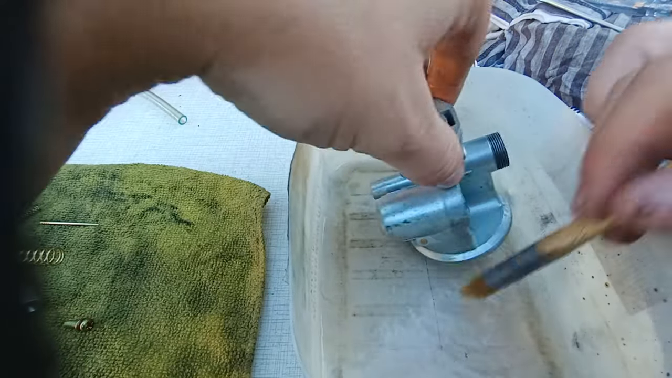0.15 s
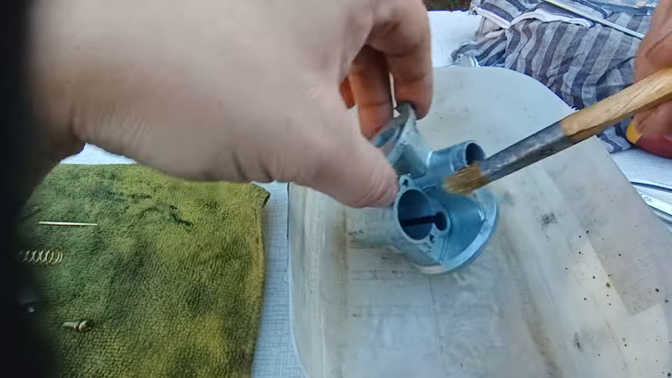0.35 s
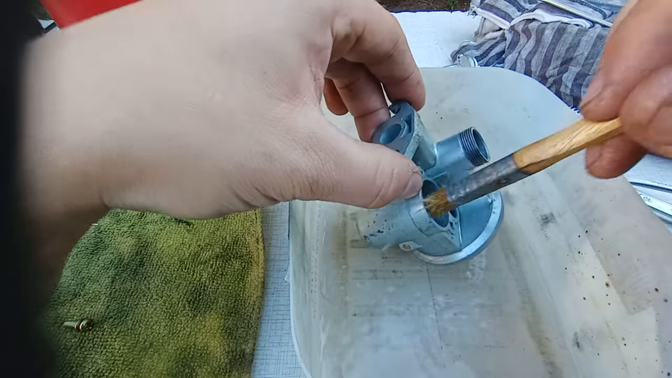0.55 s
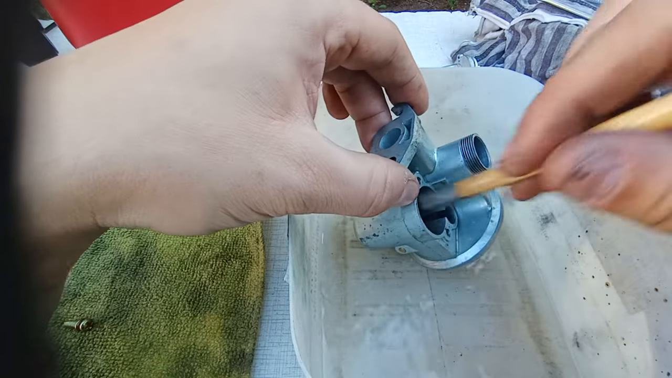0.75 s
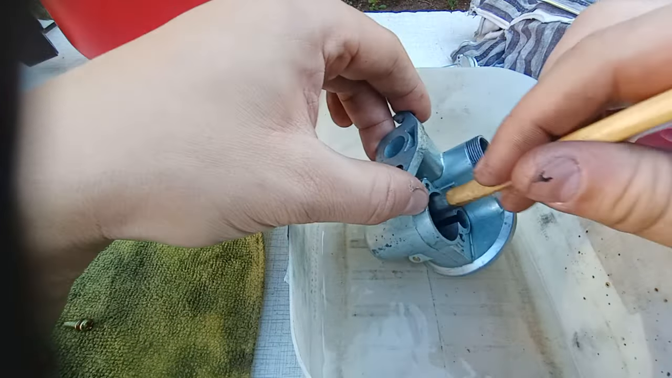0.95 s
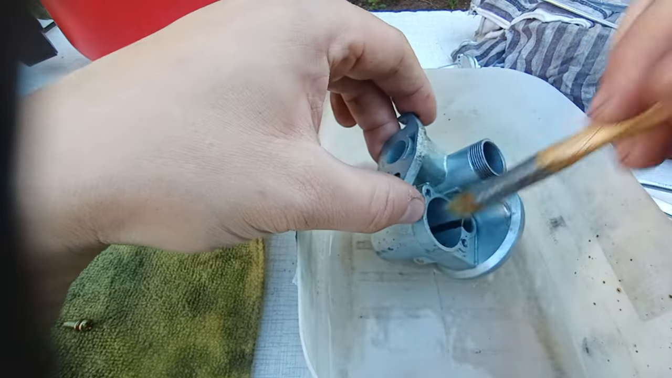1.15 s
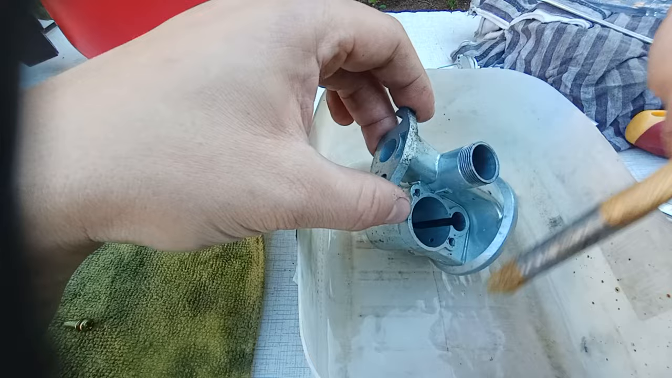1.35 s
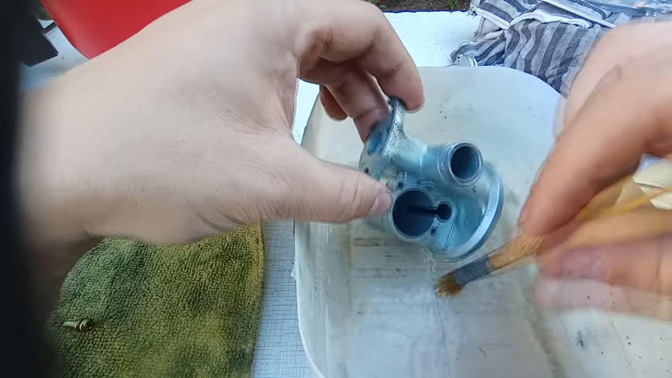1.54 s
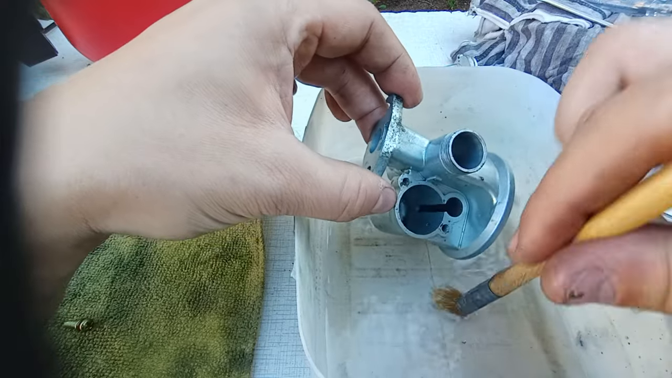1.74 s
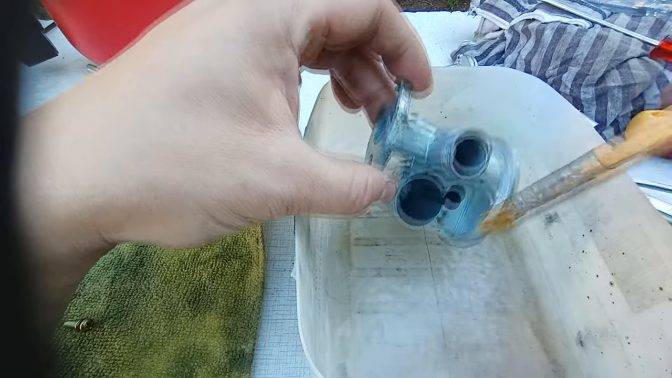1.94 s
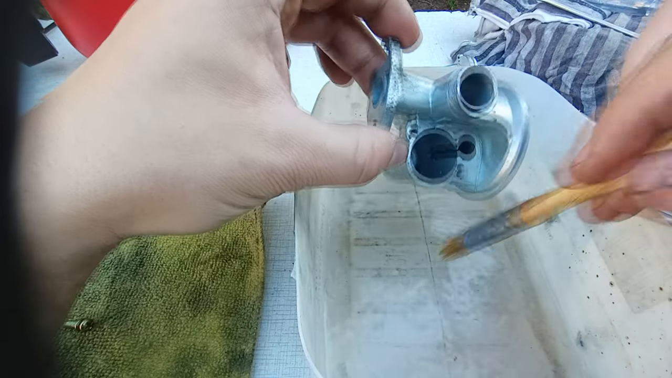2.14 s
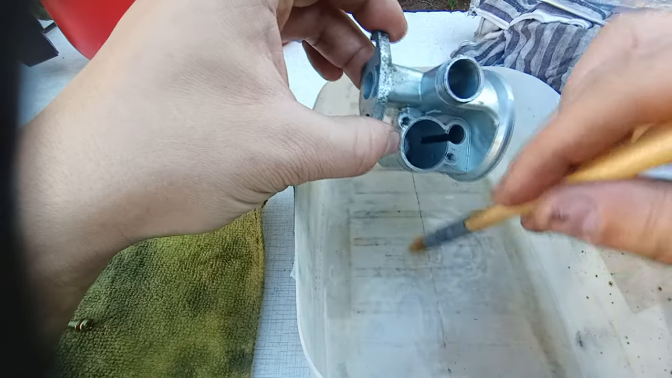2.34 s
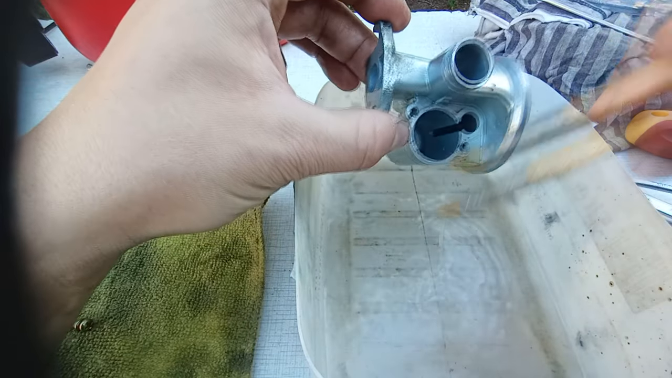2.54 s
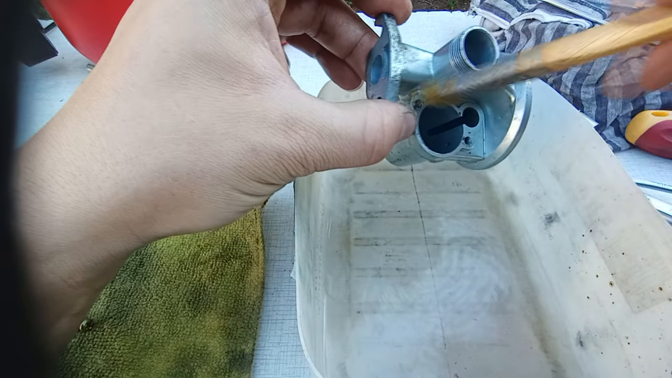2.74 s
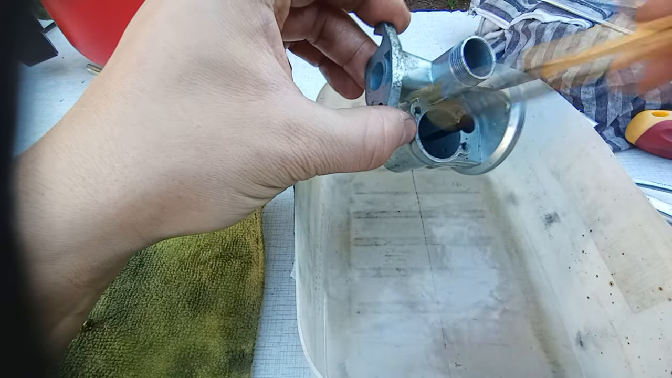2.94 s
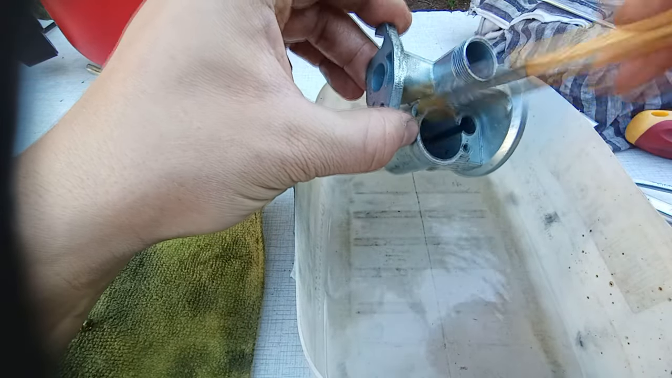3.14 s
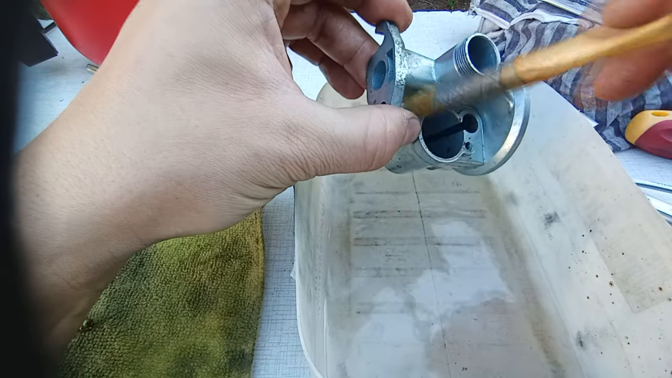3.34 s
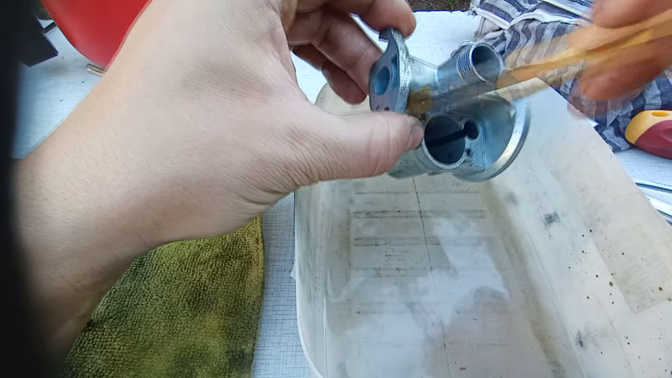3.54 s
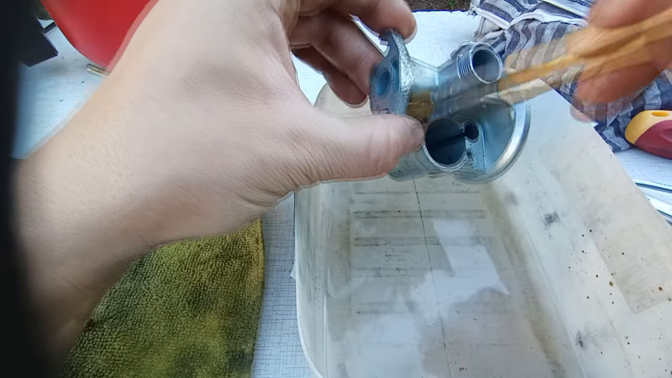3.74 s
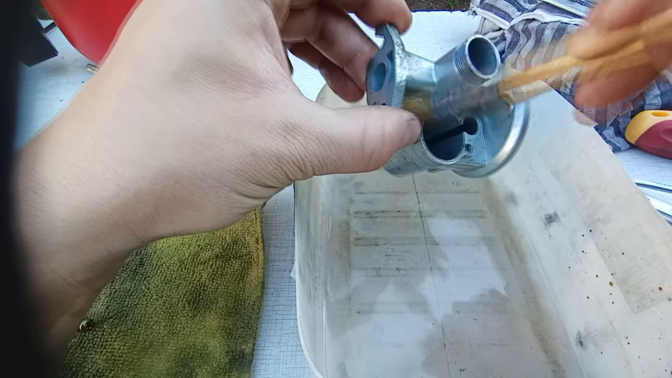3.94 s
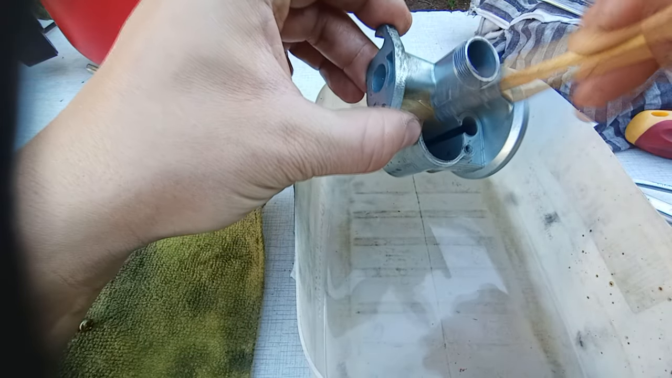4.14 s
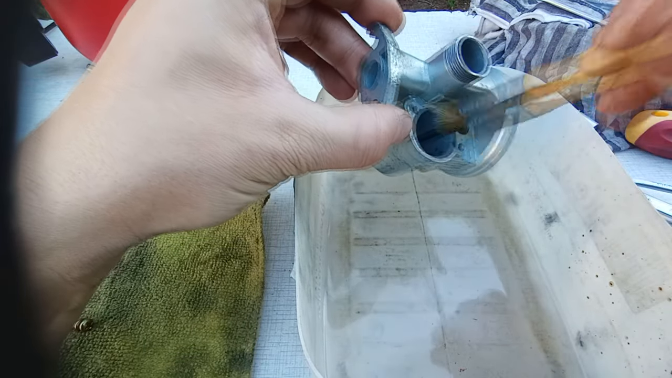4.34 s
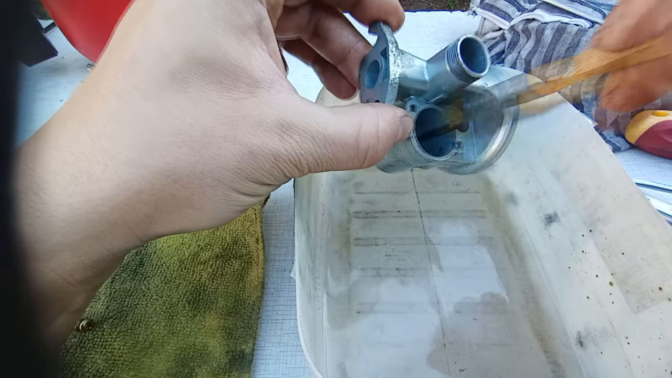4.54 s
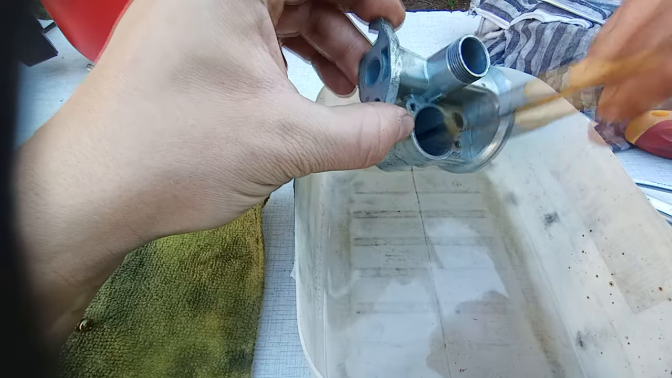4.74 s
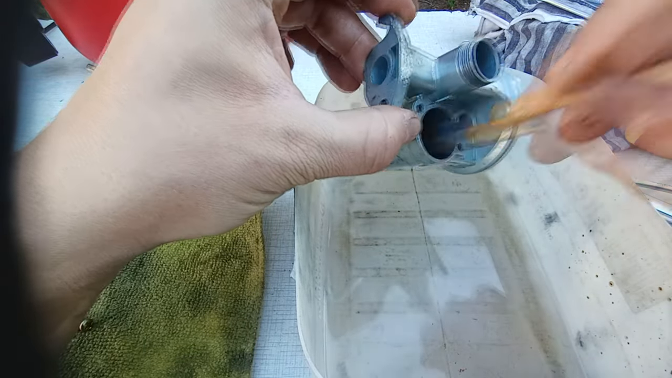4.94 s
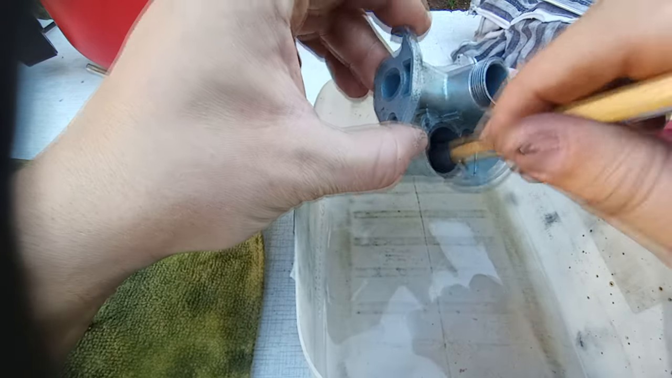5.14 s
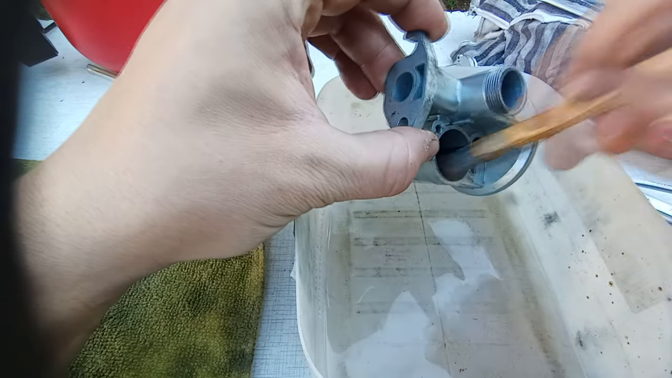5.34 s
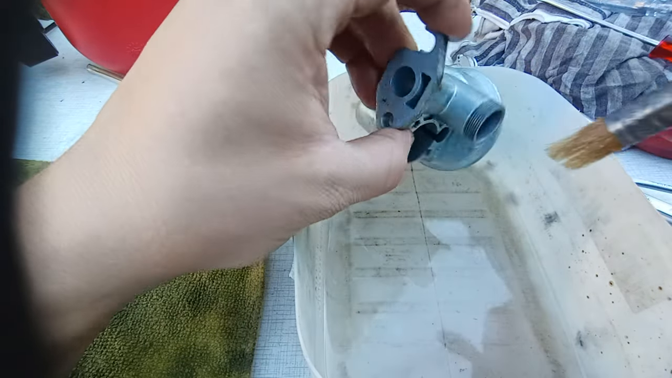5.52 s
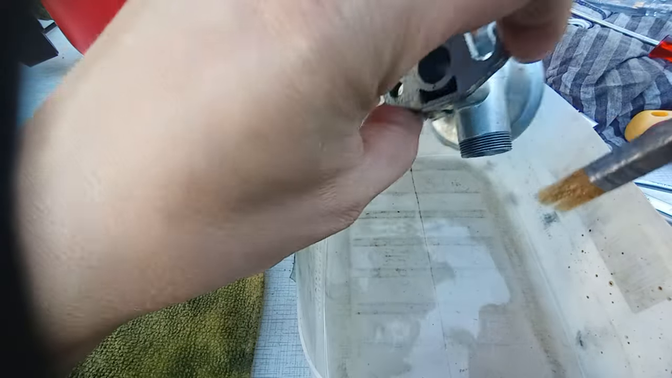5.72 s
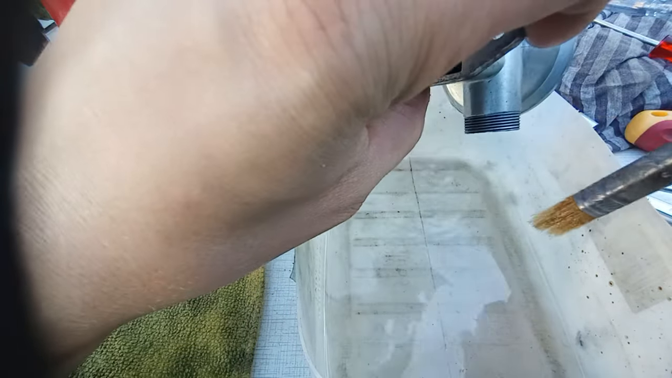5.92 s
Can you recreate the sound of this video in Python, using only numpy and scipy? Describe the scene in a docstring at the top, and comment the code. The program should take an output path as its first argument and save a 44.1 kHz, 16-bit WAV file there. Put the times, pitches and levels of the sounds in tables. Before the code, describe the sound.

A close stereo pickup outdoors, dry, with very quiet surroundings. At 0 s a small metal clink and a hollow plastic tub bump with a short scrape, over a faint low hum that soon fades. From 0.3 to 0.9 s a wet bristle brush scratches a cast-metal body, with a bright ringing tap near 0.8 s. About 1.05 s comes the strongest dull tub knock, with wet rubbing, then a metal tick at 1.2 s. Lighter tub rubs and dabs follow at 1.3, 1.5, 1.7, 2.25 and 2.4 s, with lulls between. From 2.8 to 4.9 s hissing strokes repeat about five times a second, airy and hollow in the bore, with tiny ticks. From 4.95 to 5.35 s the scrubbing turns scratchier and more metallic, with several clinks. A soft tub touch at 5.6 s ends it. Faint wind buffets, distant traffic and barely audible brief dove coos lie behind.

```python
"""A wet bristle brush scrubs a small cast-metal carburettor body: slipping bristle noise hisses, scratches,
blows the bore and wakes the casting's modes. Ferrule taps crack and ring the casting as damped sines.
Rubs and knocks sound the plastic tub below through noise, bubbles, wall modes and low thumps.
Far off a dove coos in scooped sines; low wind noise, a traffic drone, a soft hush and a fading hum are behind."""
import sys
import numpy as np
from scipy import signal
from scipy.fft import rfft, irfft, next_fast_len
from scipy.io import wavfile
from scipy.ndimage import uniform_filter1d, map_coordinates

SR = 44100
rng = np.random.default_rng(int(sys.argv[2]) if len(sys.argv) > 2 else 0)


def unload_wav(signal):
    """Save mono or channel-first audio to the path in sys.argv[1] as 16-bit WAV at rate SR, clipped to [-1, 1]."""
    wavfile.write(
        sys.argv[1],
        SR,
        np.round(np.clip(np.atleast_2d(signal).T, -1, 1) * 32767).astype(np.int16),
    )


N = 263718

# modes of the casting: mode_hz, level_db, free_t60_s, part (0 bore, 1 flange, 2 lug, 3 tube)
CASTING_MODES = [(1476, -4, .1, 0), (2380, -8.5, 0.037, 1), (2720, -14, 0.019, 1), (3290, -1.5, .085, 1),
                 (3830, -12, 0.048, 1), (5070, -0.5, .16, 2), (5394, -4.5, 0.16, 3), (5910, -1.5, 0.094, 3),
                 (6770, -18.5, .04, 3)]
# modes of the tub wall: mode_hz, level_db, t60_s
TUB_MODES = [(139, -7.5, 0.19), (348, -13, 0.08), (632, -10.5, 0.026), (686, 1.5, 0.07), (894, -4, 0.06),
             (1161, -7, .045), (1610, -4, 0.019), (1940, -15.5, 0.065), (2510, -28.5, .04)]


def strokes():
    """Bristle slips hiss, scratch the walls, sound the air in the bore and wake the casting's modes faintly."""
    # brush strokes: touch_s, rise_s, hiss_peak_db, swell_db, fade_t60_s, then re hiss: bore_db, scratch_db,
    # casting_ring_db; swish_hz
    stroke_rows = [(.315, .03, -64, 2.5, .1, -22, -18, 5, 5737),
                   (.35, .054, -50.5, 4.5, .15, -19, -3, 11, 4190),
                   (.455, 0.024, -46, 16, 0.064, -6, -5, -3, 5990),
                   (.552, .102, -50, 15, .035, 1.5, -2, -3, 5600),
                   (.72, 0.05, -61, 2.5, .05, -12, -0.5, 3, 5800),
                   (.8, .003, -45, 0.5, .3, -29, 7.5, 1.5, 4810),
                   (.845, 0.021, -42.5, 5.5, 0.2, -4.5, 0.5, -2, 4900),
                   (2.776, .008, -51, -1.5, .08, -9.5, -13.5, -4.5, 5300),
                   (2.795, 0.026, -49.5, 3.5, .1, -10.5, 6.5, -2, 3650),
                   (2.82, .024, -40.5, 13, .085, 1.5, -3.5, -2.5, 4960),
                   (2.996, .054, -44.5, 14.5, 0.049, 0.5, -10.5, -3.5, 6500),
                   (3.188, 0.066, -44, 11.5, .05, 3.5, -8.5, -1, 6440),
                   (3.368, .066, -42.5, 10, .025, 0.5, -6.5, -4.5, 6960),
                   (3.516, .04, -67, -1.5, .1, -15, -17.5, -4.5, 6570),
                   (3.57, 0.068, -47, 7, 0.067, 4, -6.5, -6.5, 6730),
                   (3.728, .03, -64, 5, 0.15, -15, -12, -5.5, 6760),
                   (3.765, .062, -48.5, 10.5, .07, 9, -4, -7, 7100),
                   (3.92, 0.025, -65.5, 3, .1, -16, -15, -5.5, 6550),
                   (3.95, .062, -48, 14.5, .04, 10, -1, -4, 6540),
                   (4.108, 0.027, -66, 0, .1, -21, -11, -1.5, 6300),
                   (4.135, 0.078, -50, 9, .09, 5.5, -3.5, -11, 6425),
                   (4.305, .05, -53.5, 5, .1, 9, -5, -14, 3728),
                   (4.36, .063, -45, 7.5, .1, -1.5, -3.5, -9, 5400),
                   (4.52, 0.065, -50.5, 9.5, .16, 4.5, -1.5, -6, 5700),
                   (4.72, 0.047, -48.5, 11, 0.23, 4, -4, -2.5, 6530),
                   (4.95, 0.0027, -54.5, 0, 0.16, 2, 1, 9, 3360),
                   (5.035, .018, -44.5, 24.5, .08, -5.5, -11, 13, 4560),
                   (5.118, .004, -51, -1.5, 0.097, -1, 7, 6, 3994),
                   (5.19, 0.022, -55.5, 1.5, .05, -7, 9, 9, 5400),
                   (5.214, .004, -44.5, 5, .12, -9, 1.5, 13, 5370),
                   (5.29, .003, -50.5, -3, .08, -10, -13, 11.5, 5394),
                   (5.31, .046, -56.5, 2, .16, 9, 7, 9, 5400)]
    # bristle hiss spectrum: hz, gain_db
    hiss_spectrum = [(2500, -37.5), (3800, -18), (5000, -8), (6500, -1.5), (7400, -6.5), (8100, -17.5),
                     (10000, -27.5), (12400, -28.5), (14700, -22.5), (15700, -29.5)]
    # wall scratch spectrum: hz, gain_db
    scratch_spectrum = [(700, -33), (1000, -17.5), (2000, -0.5), (3500, 3), (4500, -10.5), (6000, -37.5)]
    hiss_db, rising_db, fading_db, _, bore_db, scratch_db, ring_db, swish_hz = gestures(
        stroke_rows, touch_db_per_s=1602)
    # dB change re hiss per dB that the hiss lies under its peak
    bore_db = bore_db - 0.65 * rising_db - 0.1 * fading_db
    scratch_db = scratch_db - 0.6 * rising_db + 0.15 * fading_db
    slips = bristles(rate=1500, spread_db=4.0, smooth=0.57, clump_db=1.9, patchy_db=2.5)

    # the free length of the bent bristles sets where the swish is strongest
    hz, t, z = signal.stft(slips, SR, nperseg=256)
    centre_hz = swish_hz[np.minimum((t * SR).astype(int), N - 1)]
    log_offset = np.log((hz[:, None] + 1) / centre_hz)
    swish_gain = amp(7.4 * np.exp(-(log_offset / 0.097) ** 2))
    swish = signal.istft(z * swish_gain, nperseg=256)[1][:N]
    hiss = amp(hiss_db) * coloured(swish, hiss_spectrum)
    scratch = amp(hiss_db + scratch_db - 2.5) * coloured(swish, scratch_spectrum)

    def bore(hz):
        return resonance(hz, 1540, 0.05)
    push = evened(slips, size=300)
    blown = filtered(amp(hiss_db + bore_db) * push, bore) / np.std(filtered(push, bore))
    # the bore mode is left out here
    ring = filtered(amp(ring_db) * (hiss + scratch), lambda hz: mode_bank(hz, CASTING_MODES[1:]))
    return hiss + scratch + blown + ring


def taps():
    """Each ferrule tap is a short crack and rings the parts it lands nearest; gripping fingers damp the ring."""
    # taps: start_s, crack_db, bore_db, flange_db, lug_db, tube_db, pan_db (+ left), share of free ring time
    tap_rows = [(0.0024, -19.5, -36.5, -25.5, -37, -38, 3.5, 0.82),
                (0.1696, -58, -58, -62, -75, -58, 0, 0.89), (0.4761, -38.5, -55, -68, -64.5, -58, 4, 0.66),
                (0.5638, -46, -58, -91, -76.5, -59, 2.5, 0.49), (0.586, -41, -61, -68, -70, -51, 0, 0.44),
                (0.6535, -39, -62, -61, -43, -38, 3, 0.2), (0.7424, -38, -53, -61, -65, -39, 5, 0.25),
                (0.767, -22.5, -53, -50, -51, -29, 6, 0.12),
                (0.785, -10.5, -35.5, -13.5, -53, -15, 5, 0.44),
                (0.819, -24.5, -61, -33.5, -55, -36, 5, 0.69), (0.978, -24, -58, -44, -66, -51, -4, 0.52),
                (0.9962, -17, -60, -54, -65, -43, 10, 0.94),
                (1.1961, -16, -39, -38, -37.5, -44.5, -8, 0.87),
                (2.7444, -31, -59, -49.5, -61.5, -64.5, -6, 0.46),
                (2.779, -42, -60, -63, -51, -60, 3, 0.57), (2.8496, -30.5, -52, -53, -46, -51, -7.5, 0.2),
                (3.0479, -32, -36, -57.5, -58.5, -54.5, 3.5, 0.34),
                (3.5704, -51.5, -56.5, -69, -60.5, -48, 1, 0.65),
                (3.6375, -34, -44, -54, -61.5, -61, 6, 0.51), (4.3011, -29, -39.5, -54, -70, -55, 0, 0.64),
                (4.3114, -28.5, -40.5, -48, -63, -60, -18, 0.68),
                (4.4136, -27.5, -38, -40, -42, -34.5, -2, 0.34),
                (4.943, -20, -27.5, -26, -70.5, -35.5, -3, 0.45),
                (4.9739, -28, -53, -45, -62, -51, 1, 0.49), (5.0526, -19.5, -65, -38.5, -53, -42, 3, 0.61),
                (5.1186, -24.5, -52, -37.5, -77, -51, 8, 0.93), (5.1868, -27, -41, -37, -71, -63, 2, 0.88),
                (5.216, -21.5, -60, -34, -58, -33.5, -7, 0.2), (5.2248, -24, -44, -59, -58, -68, 13, 1),
                (5.2818, -22, -34, -29.5, -51, -45, -1.5, 0.5)]
    # crack spectrum: hz, gain_db
    crack_spectrum = [(350, -53), (600, -19), (2220, 6), (2790, 0), (4200, -7), (5590, -2.5), (7330, -7.5),
                      (8630, -32.5), (15500, -39)]
    out, t = np.zeros((2, N + SR)), np.arange(SR // 6) / SR
    crack_gain = amp(along(crack_spectrum, np.fft.rfftfreq(len(t), 1 / SR)))
    crack_fade = amp(-60 * t / 0.0057) + 0.19 * amp(-60 * t / 0.061)
    for start_s, crack_db, *parts_db, pan_db, free in tap_rows:
        ring = 0
        for mode_hz, mode_db, t60_s, part in CASTING_MODES:
            level_db = parts_db[part] + mode_db + 3.0 + rng.normal(0, 0.32)
            fade = amp(-60 * t / (t60_s * np.clip(free, .1, 2)))
            # contact with wet bristles makes each mode waver
            waver = np.cumsum(rng.standard_normal(len(t))) * 0.022
            phase = 2 * np.pi * mode_hz * rng.normal(1, .002) * t + waver + lead_of(mode_hz)
            ring = ring + amp(level_db) * fade * np.sin(phase)
        ring = ring * (1 - np.exp(-t / 0.00018))
        # part shared by both ports, part separate
        noise = rng.standard_normal(len(t)) + .9 * rng.standard_normal((2, len(t)))
        burst = unit(irfft(rfft(noise) * crack_gain, len(t))) * (1 - np.exp(-t / 0.00025))
        crack = amp(crack_db - 6.0) * crack_fade * burst
        pan = amp([[0.15 * pan_db], [-.3 * pan_db]])
        out[:, round(start_s * SR):][:, :len(t)] += (ring + crack) * pan
    return out[:, :N]


def scrapes():
    """Rubbing shakes the tub wall and its liquid, rasps on its ribs and fizzes in the wet bristles."""
    # rubs: touch_s, rise_s, wall_peak_db, swell_db, fade_t60_s, then re wall: rasp_db, fizz_db
    scrape_rows = [(.03, 0.0062, -21.5, 1, 0.072, -9.5, -19.5), (.058, 0.014, -35.5, 0, .27, -3.5, -7),
                   (.183, 0.0087, -52, -2.5, 0.082, 1.5, -16.5), (.68, 0.13, -61, 4.5, 0.055, 3.5, 1.5),
                   (.83, .016, -45, 20, .14, -0.5, 3.5), (.89, 0.043, -35.5, 19, .13, -7.5, -18.5),
                   (.97, .01, -50, 11, 0.044, 3, 5), (1.02, 0.019, -45, 11, .05, -8, -1),
                   (1.047, 0.0055, -30, -1, 0.084, -1.5, -9), (1.085, 0.038, -37.5, 3.5, 0.18, -2, -7.5),
                   (1.272, 0.02, -51, 19, 0.083, -12, -17), (1.305, .029, -41.5, 21, 0.071, -11.5, -23.5),
                   (1.39, 0.061, -52, -3.5, 0.076, -4.5, -12), (1.475, 0.015, -43.5, 19, 0.14, 1.5, -6.5),
                   (1.512, 0.0056, -34, 9, 0.19, -6.5, -5.5), (1.57, .05, -60.5, -5, .2, -1, -2.5),
                   (1.63, .029, -56, 7, .08, 3, 3), (1.729, 0.0081, -38, 5, .15, 0.5, -1.5),
                   (1.79, 0.03, -57.5, 3, .08, 6.5, 8.5), (2.245, 0.0085, -35.5, 4.5, 0.082, -2.5, -2.5),
                   (2.28, 0.024, -55.5, 3.5, 0.092, 1, 11), (2.378, .006, -38.5, 2, 0.16, -4, -7.5),
                   (2.42, 0.043, -61, -7, 0.103, 3.5, 0.5), (4.47, 0.25, -66.5, 5.5, .25, -0.5, -0.5),
                   (5.115, 0.034, -54.5, 10.5, 0.093, -1, -6.5), (5.6, 0.024, -45.5, 15, .073, -4.5, -17.5)]
    # wall rumble spectrum: hz, gain_db
    wall_spectrum = [(120, -47.5), (300, -5.5), (450, 8.5), (700, 2), (1200, 5), (1700, -18), (2500, -56)]
    # rib rasp spectrum: hz, gain_db
    rasp_spectrum = [(1000, -37), (1500, -1.5), (2300, 4.5), (3200, -7.5), (4200, -13), (5500, -53)]
    # bristle fizz spectrum: hz, gain_db
    fizz_spectrum = [(1760, -37.5), (3000, -10.5), (4480, -2), (4870, -4.5), (5400, -3), (7430, -7),
                     (8540, -33), (12900, -35.5), (14500, -29), (15700, -31)]
    wall_db, rising_db, fading_db, _, rasp_db, fizz_db = gestures(scrape_rows, touch_db_per_s=7000)
    # dB gained re wall per dB that the wall lies under its peak
    rasp_db = rasp_db + 0.3 * rising_db + 0.05 * fading_db
    fizz_db = fizz_db + 0.17 * rising_db + 0.033 * fading_db
    slips = bristles(rate=2800, spread_db=3.5, smooth=0.68, clump_db=2.0, patchy_db=1.0)
    wall = filtered(coloured(slips, wall_spectrum), lambda hz: 1 + 1.9 * mode_bank(hz, TUB_MODES))
    wet_wall = unit(wall) + 0.41 * bubbles(count=1500, centre_hz=710, cycles=3.3)
    rasp = coloured(slips, rasp_spectrum) + 0.21 * bubbles(count=2400, centre_hz=2280, cycles=5.7)
    fizz = coloured(slips, fizz_spectrum)
    return amp(wall_db) * (unit(wet_wall) + amp(rasp_db) * unit(rasp) + amp(fizz_db) * fizz)


def knocks():
    """Each knock rings the tub's modes at new strengths; a hard contact adds a bright puff."""
    # knocks: start_s, level_db, bright_db, overall_t60_s, pan_db (+ left)
    knock_rows = [(0.03, -14.5, -29.5, 0.25, 10), (0.183, -52.5, 13, 0.049, 5.5),
                  (0.393, -41, -1.5, 0.084, 6), (1.049, -10.5, -11, 0.082, 7.5),
                  (1.329, -49.5, -20, 0.056, -9), (1.489, -36, -5, 0.06, -3), (1.515, -26, -15.5, 0.06, -3),
                  (1.732, -30, -18.5, 0.07, 6.5), (2.246, -39, -4, 0.06, 1),
                  (2.377, -41.5, -8.5, 0.076, 23), (5.619, -37.5, -20, 0.046, -11)]
    out, t = np.zeros((2, N + SR)), np.arange(SR // 4) / SR
    puff_band = signal.butter(2, [1500 * 2 / SR, 7000 * 2 / SR], "band")
    for start_s, level_db, bright_db, overall_t60_s, pan_db in knock_rows:
        fade = amp(-60 * t / max(overall_t60_s, .01))
        ring = 0
        for mode_hz, mode_db, t60_s in TUB_MODES:
            envelope = amp(mode_db + rng.normal(0, 5.1) - 60 * t / t60_s)
            phase = 2 * np.pi * mode_hz * rng.normal(1, 0.02) * t + lead_of(mode_hz)
            ring = ring + envelope * np.sin(phase)
        body = amp(level_db - 7.5) * np.sqrt(fade) * (1 - np.exp(-t / 0.00089)) * ring
        noise = signal.lfilter(*puff_band, rng.standard_normal((2, len(t))))
        puff = amp(level_db + bright_db - 19.5) * fade * noise
        pan = amp([[0.5 * pan_db], [-.3 * pan_db]])
        out[:, round(start_s * SR):][:, :len(t)] += (body + puff) * pan
    return out[:, :N]


def dove():
    """Soft, nearly pure coos that scoop up to pitch and sag in level, a little unsteady from the distance."""
    # coos: start_s, length_s, opening_db, pitch_hz
    coo_rows = [(1.983, .02, -68, 670), (2.465, 0.13, -58, 700), (4.011, .08, -60.5, 700.6),
                (4.555, 0.035, -64, 705), (5.716, 0.066, -61.5, 696)]
    sag_db_per_s, t60_s, scoop_hz, scoop_s = 95, .13, 15, 0.0151
    rows = []
    for start_s, length_s, opening_db, pitch_hz in coo_rows:
        sag_db = sag_db_per_s * length_s
        # negative swell: the level falls from the opening
        rows.append((start_s, length_s, opening_db - sag_db, -sag_db, t60_s, pitch_hz))
    level_db, _, _, age_s, hz = gestures(rows, touch_db_per_s=1100)
    hz = hz - scoop_hz * np.exp(-age_s / scoop_s)
    coo = np.sin(2 * np.pi * np.cumsum(hz + 9 * wobble(45)) / SR)
    unsteady_db = 5 * np.array([wobble(28), wobble(22)])
    return np.sqrt(2) * amp(level_db + unsteady_db) * coo


def outdoors():
    """Low buffets in lumps (wind, some tub thumps), far traffic, a soft patchy hush and a hum that fades out."""
    # low buffets, wind and bass thumps of the tub near 0-0.2 s and 1.0 s: time_s, buffet_db, left_minus_right_db
    buffet_rows = [(0.0, -63, 9), (0.2, -62, 2.5), (0.4, -77.5, 3), (0.7, -75, 6.5), (0.96, -59, 7),
                   (1.06, -53, 10), (1.2, -67.5, 6), (1.45, -69.5, -5), (1.51, -53.5, -17),
                   (1.7, -52.5, -18.5), (1.82, -63, -16), (2.18, -61.5, -16), (2.27, -63, 3.5),
                   (2.7, -77.5, 6.5), (3.76, -72, 2.5), (4.6, -78.5, 9), (5.2, -71.5, -5.5),
                   (5.27, -55.5, -23.5), (5.45, -55, -18.5), (5.66, -62, -10), (5.98, -61.5, -13.5)]
    # hush, fuller while the hands move: time_s, level_db
    hush_rows = [(0.0, -43), (0.18, -65), (0.46, -67), (1.0, -47.5), (1.23, -55), (1.65, -68), (3.78, -69),
                 (4.58, -61.5), (4.95, -69.5), (5.21, -60.5), (5.4, -67), (5.98, -66.5)]
    # hum: time_s, level_db, pitch_hz
    hum_rows = [(0, -60, 65), (.4, -63, 64.8), (.7, -71, 64.3), (.8, -97.5, 65)]
    # buffet spectrum: hz, gain_db
    buffet_spectrum = [(12, -49.5), (20, -20), (41, -12.5), (61, 4), (134, 1), (236, -10.5), (300, -20),
                       (400, -26.5), (520, -52.5), (880, -120)]
    # hush spectrum before the treble lift: hz, gain_db
    hush_spectrum = [(88, -27.5), (150, -12), (419, -14), (726, -16), (1350, -23.5), (2480, -23.5),
                     (3580, -37.5), (3920, -38), (6320, -42.5), (6800, -35.5), (7870, -55.5),
                     (12000, -61.5), (15600, -92), (22000, -120)]
    # far traffic spectrum: hz, gain_db
    drone_spectrum = [(12, -45.5), (20, -14.5), (35, -4.5), (59, 2), (108, -4), (160, -13.5), (210, -41.5),
                      (350, -120)]
    buffet_db, pan_db = curves(buffet_rows)
    hush_db, = curves(hush_rows)
    hum_db, hum_hz = curves(hum_rows)

    a, b = rng.standard_normal((2, N))
    lumps = amp(3.7 * np.array([wobble(21), wobble(24)]) + [pan_db / 2, -pan_db / 2])
    rumble = evened(coloured(np.array([a + .5 * b, a - .5 * b]), buffet_spectrum), size=6000)
    buffet = amp(buffet_db + 1.0) * lumps * rumble

    a, b = rng.standard_normal((2, N))
    traffic = amp(-76) * coloured(np.array([a + 0.56 * b, a - 0.48 * b]), drone_spectrum)

    z = signal.stft(rng.standard_normal((2, N)), nperseg=256)[2]
    a, b = signal.istft(z * amp(3.5 * patches(z.shape[1:], 3, 25)), nperseg=256)[1][:, :N]
    hush = coloured(np.array([a + 1.1 * b, a - 0.7 * b]), hush_spectrum)
    treble = filtered(hush, lambda hz: 1 / (1 + (3500 / (hz + 1)) ** 4))
    lifted = hush + (amp(5) - 1) * treble  # 5 dB treble lift
    hush = amp(hush_db - 1.0 + 0.9 * wobble(17)) * lifted

    hum = amp(hum_db + 1.5 * wobble(7.3)) * np.sin(2 * np.pi * np.cumsum(hum_hz) / SR)
    return buffet + traffic + hush + hum


def gestures(rows, touch_db_per_s):
    """Each gesture lands fast, swells to its peak, fades and lifts off; overlapping gestures blend their
    columns, weighted by power. Gives level dB, dB under the peak while rising and while fading, seconds since
    landing, and the columns."""
    lift_db, lift_db_per_s = 18.5, 1500.5  # once faded this far the contact lifts off, at this speed
    start_s, rise_s, peak_db, swell_db, t60_s, *cols = np.transpose(rows)[..., None]
    t = np.arange(0, N / SR, .001)
    rise_s, age_s = np.maximum(rise_s, .001), t - start_s
    rising_db = swell_db * (1 - np.clip(age_s / rise_s, 0, 1)) + touch_db_per_s * np.maximum(-age_s, 0)
    fading_db = 60 * np.maximum(age_s - rise_s, 0) / np.maximum(t60_s, .01)
    fading_db = fading_db + lift_db_per_s * np.maximum(age_s - rise_s - t60_s * lift_db / 60, 0)
    power = amp(2 * np.maximum(peak_db - rising_db - fading_db, -300))
    total = power.sum(axis=0)
    share = power / total
    values = [np.minimum(rising_db, 25), np.minimum(fading_db, 40), np.clip(age_s, 0, 1), *cols]
    mixed = [10 * np.log10(total)] + [(share * v).sum(axis=0) for v in values]
    return [np.interp(np.arange(N) / SR, t, v) for v in mixed]


def bristles(rate, spread_db, smooth, clump_db, patchy_db):
    """Bristle tips slip one by one in clumps, over a smooth wet swish whose colour comes in patches."""
    size = amp(spread_db * np.minimum(rng.exponential(size=N), 2.5))
    slips = (rng.random(N) < rate / SR) * rng.standard_normal(N) * size
    clumps = amp(clump_db * (wobble(70) + wobble(200)))
    mixed = (unit(slips) + smooth * rng.standard_normal(N)) * clumps
    z = signal.stft(mixed, nperseg=128)[2]
    patchy = signal.istft(z * amp(patchy_db * patches(z.shape, 3, 12)), nperseg=128)[1][:N]
    # level evened over some 30 ms, so no single slip sticks out
    return evened(patchy, size=1400)


def bubbles(count, centre_hz, cycles):
    """Liquid squeezed from the bristles: small bubbles of rising pitch with a soft start."""
    draw = rng.random((count, 2))
    hz = centre_hz * np.exp(0.66 * rng.standard_normal(len(draw)))[:, None]
    t = np.arange(SR // 60) / SR
    life_s = cycles / hz
    tone = np.sin(2 * np.pi * hz * t * (1 + 0.052 * t / life_s))
    blip = tone * amp(-40 * t / life_s) * (1 - np.exp(-t * hz * 2.0))
    at = (draw[:, :1] * N).astype(int) + np.arange(len(t))
    return unit(np.bincount(at.ravel(), (blip * amp(-14 * draw[:, 1:])).ravel())[:N])


def ports(x, side, low_hz, diffuse):
    """Two ports hear a small near source, weak in the bass, at unlike levels, plus scattered close reflections."""
    def response(hz):
        return amp([[.5], [-.5]] * along(side, hz)) * (1j * hz / (low_hz + 1j * hz)) ** 3
    direct = filtered(x, response)
    t = np.arange(SR // 20) / SR
    tail = rng.standard_normal((2, len(t))) * amp(-60 * t / 0.022)
    reflections = signal.fftconvolve(direct, tail / np.linalg.norm(tail[0]), axes=1)[:, :N]
    return direct + diffuse * reflections


def shifting(x):
    """Moving hands keep changing the phase by which the left port leads the right."""
    # average lead of the left port: hz, lead_rad
    mean_lead = [(100, .1), (600, 1.5), (1100, 0.96), (1600, 1.1), (15000, 2.6)]
    # rms change of that lead: hz, shift_rad
    lead_shift = [(300, 0.22), (1000, 1.2), (2000, 2.29), (15000, 3.9)]
    hz, _, z = signal.stft(x, SR, nperseg=256)
    lead = along(mean_lead, hz)[:, None] + along(lead_shift, hz)[:, None] * patches(z.shape, 5, 60)
    return signal.istft(z * np.exp(.5j * np.array([lead, -lead])), nperseg=256)[1][:, :N]


def lead_of(hz):
    """Half the phase lead of one mode in one blow, for each port, in radians."""
    return np.clip(rng.normal(1.7, .6), -2.2, 2.2) * min(hz / 600, 1) * np.array([[.5], [-.5]])


def resonance(hz, centre_hz, t60_s):
    """Causal response of one mode, 1 at its centre."""
    width = np.log(1000) / (np.pi * t60_s)
    return 1j * hz * width / (centre_hz ** 2 - hz ** 2 + 1j * hz * width)


def mode_bank(hz, modes):
    """Summed response of (Hz, dB, t60 s) modes; further columns are ignored."""
    return sum(amp(db) * resonance(hz, mode_hz, t60_s) for mode_hz, db, t60_s, *_ in modes)


def amp(db):
    """Gain of a level in dB."""
    return 10 ** (np.asarray(db) / 20)


def unit(x):
    """x at rms 1."""
    return x / np.sqrt(np.mean(x ** 2) + 1e-20)


def evened(x, size):
    """x with its level evened over size samples, at rms 1."""
    return unit(x / np.sqrt(np.abs(uniform_filter1d(x ** 2, size=size)) + 1e-12))


def along(points, hz):
    """(Hz, value) points interpolated on a log axis."""
    f, v = np.transpose(points)
    return np.interp(np.log(hz + 1), np.log(f + 1), v)


def curves(rows):
    """One value per sample for each column after the time."""
    s, *cols = np.transpose(rows)
    return [np.interp(np.arange(N) / SR, s, c) for c in cols]


def wobble(rate):
    """A smooth random curve, rate knots a second."""
    return map_coordinates(rng.standard_normal(int(N * rate / SR) + 4), [np.arange(N) * rate / SR])


def patches(shape, wide, long):
    """A random field at rms 1, smooth over wide bins and long frames."""
    smooth_bins = uniform_filter1d(rng.standard_normal(shape), size=wide, axis=0)
    return unit(uniform_filter1d(smooth_bins, size=long, axis=1))


def filtered(x, response):
    """x filtered by a complex response of frequency."""
    m = next_fast_len(N + SR // 2)
    return irfft(rfft(x, m) * response(np.fft.rfftfreq(m, 1 / SR)), m)[..., :N]


def coloured(x, spectrum):
    """x shaped by (Hz, dB) points, at rms 1."""
    return unit(filtered(x, lambda hz: amp(along(spectrum, hz))))


def scene():
    """Casting and tub are near; the dove and the open air are far."""
    # casting balance: hz, left_minus_right_db
    metal_side = [(60, -2), (180, -1), (550, 5), (1650, 2), (4970, 4.5), (15000, 1.5)]
    # tub balance: hz, left_minus_right_db
    tub_side = [(60, -7), (180, 5), (550, 2.5), (1650, 1.5), (4970, 1), (15000, -2)]
    metal = ports(shifting(strokes()) + taps(), metal_side, low_hz=170, diffuse=0.43)
    tub = ports(shifting(scrapes()) + knocks(), tub_side, low_hz=87.4, diffuse=0.36)
    return 1.178 * metal + 1.24 * tub + dove() + outdoors()


def record(dry):
    """Nothing passes above the 15.8 kHz band limit."""
    return filtered(dry, lambda hz: hz < 15800)


dry = scene()
out = record(dry)
unload_wav(out)
```